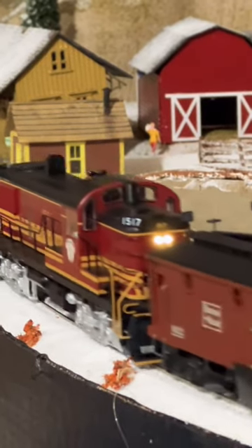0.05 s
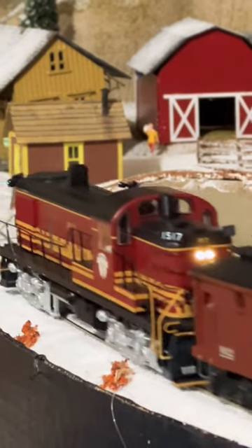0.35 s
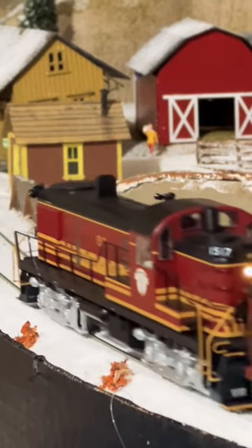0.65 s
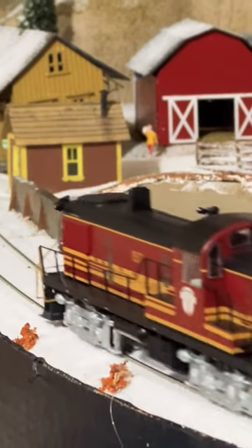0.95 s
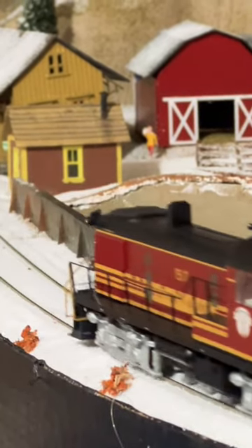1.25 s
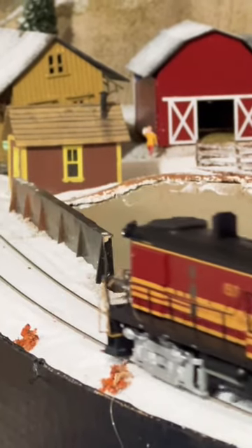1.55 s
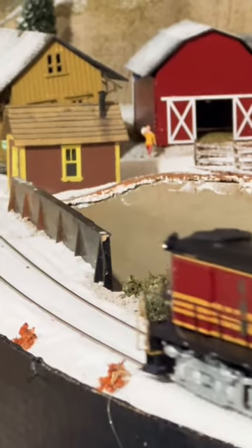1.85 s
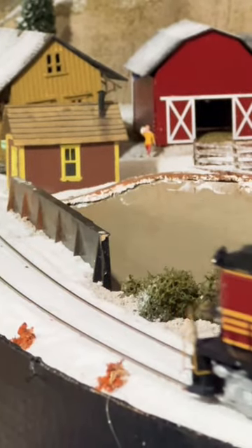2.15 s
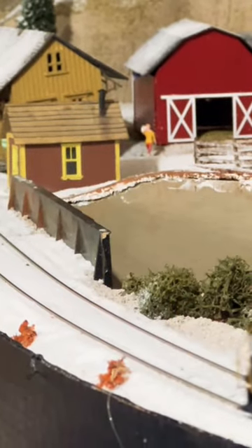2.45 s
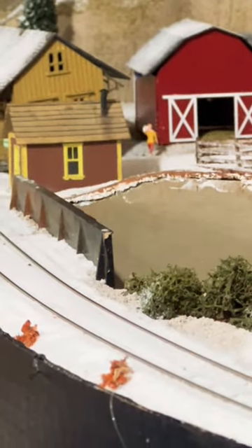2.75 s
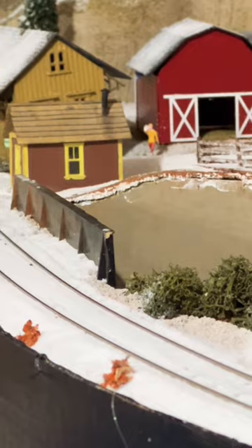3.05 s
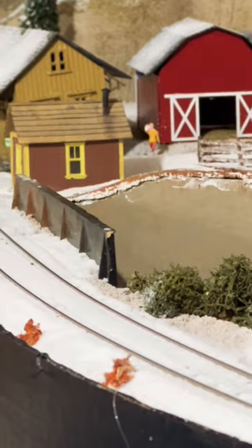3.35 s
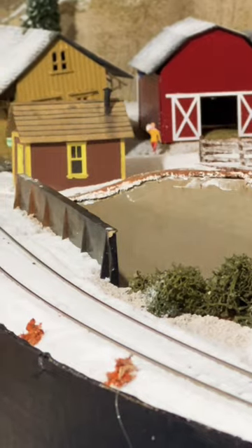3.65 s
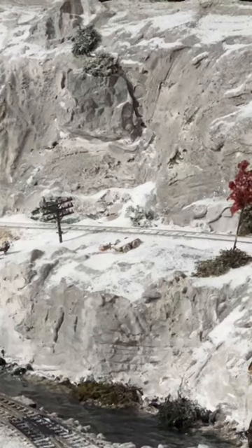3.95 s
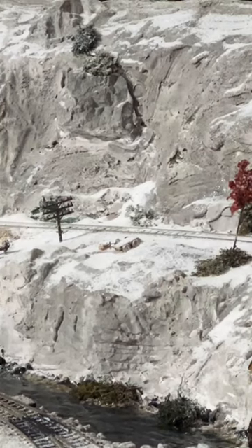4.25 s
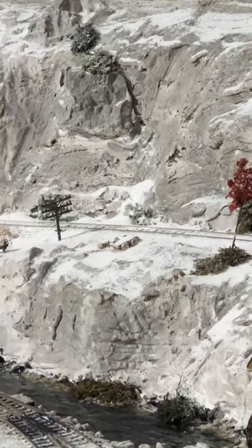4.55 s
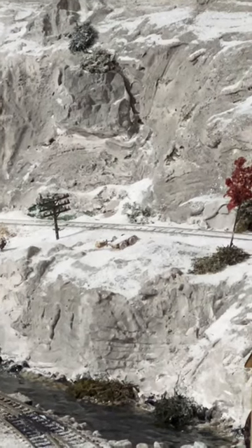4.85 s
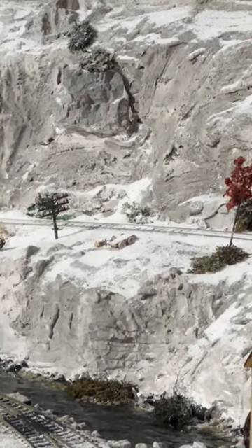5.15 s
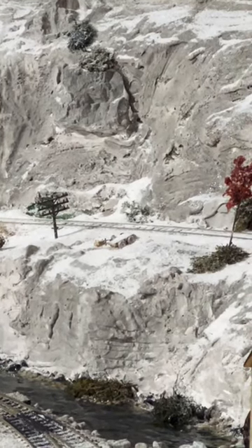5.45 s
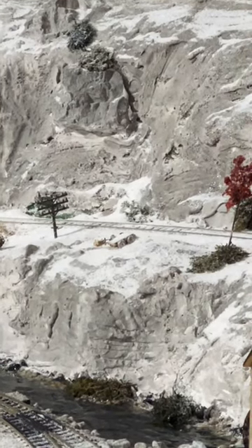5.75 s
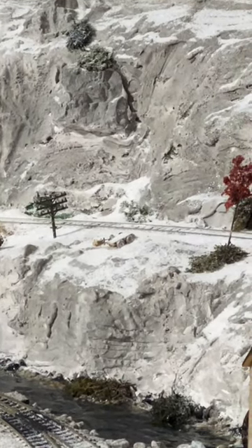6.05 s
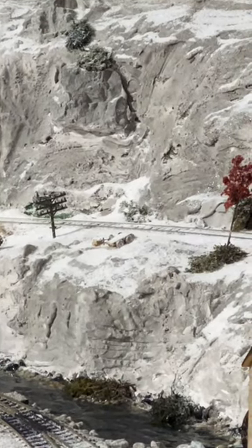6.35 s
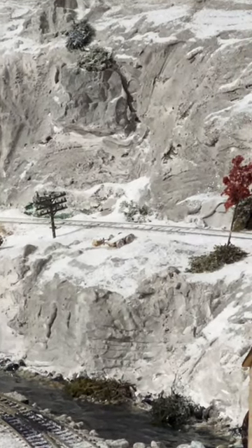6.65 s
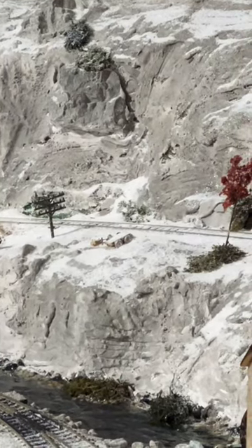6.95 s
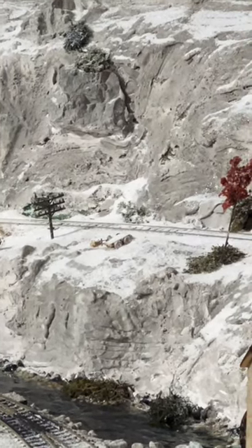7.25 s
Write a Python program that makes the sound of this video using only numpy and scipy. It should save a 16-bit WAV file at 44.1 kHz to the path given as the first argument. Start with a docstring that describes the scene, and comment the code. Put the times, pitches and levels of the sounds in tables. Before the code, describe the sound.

A model train runs close by with a throbbing mechanical buzz and irregular knocks, then sounds suddenly quieter and farther away.

```python
"""On a table layout an electric model locomotive hauls its cars, heard close by on a bend, then
abruptly from farther off at a cliff. Tooth impacts and rolling noise force the plastic shell, board
and rails into a buzz that throbs with each turn of the axle; slack in the drive knocks in time with it.
The board drones under the wheels, the flanges set the rail singing, the wheels clack over rail joints,
the pickups tick now and then, and the room hums."""
import sys
import numpy as np
from scipy import signal
from scipy.fft import rfft, irfft
from scipy.io import wavfile
from scipy.ndimage import uniform_filter1d, map_coordinates

SR = 44100
rng = np.random.default_rng(int(sys.argv[2]) if len(sys.argv) > 2 else 0)


def int16_out(signal):
    """Quantize to a 16-bit WAV file."""
    q = np.round(np.clip(np.atleast_2d(signal).T, -1, 1) * 32767)
    wavfile.write(sys.argv[1], SR, q.astype(np.int16))


N = 326340
TIME = np.arange(N) / SR
FREQ = np.maximum(np.arange(N // 2 + 1) * SR / N, 1)
CUT_S = 3.676   # the listener moves from the bend to the cliff

# rotation of the axle, about 6.4 turns a second: t/s, angle/turns
AXLE = [(0, -.39), (.522, 3), (1.307, 8), (1.614, 10), (2.255, 14), (3.19, 20), (3.675, 23.13),
        (3.68, 23.66), (5.133, 33), (6.402, 41), (7.4, 47.4)]
# level of the train at each place: t/s, gear whir/dB, treble/dB, hiss/dB
BEND_RUN = [(0, -31.5, -58.5, -57), (.8, -31, -57.5, -54.5), (1.1, -32, -58.5, -56.5),
            (1.45, -31, -58.5, -54), (1.8, -31, -56.5, -49), (2.101, -29.5, -55, -52.5),
            (2.45, -29, -49.5, -49), (2.85, -28, -51, -51), (3.1, -27.5, -50.5, -51), (3.37, -27, -47, -51),
            (3.65, -27, -49.5, -57.5)]
CLIFF_RUN = [(3.7, -38.5, -56, -54.5), (4.25, -37.5, -58, -52.5), (4.6, -38, -58.5, -55),
             (5, -38, -57, -54.5), (5.3, -37, -54.5, -55.5), (5.7, -36, -59.5, -54.5),
             (6.02, -35, -53.5, -50.5), (6.35, -35.5, -55.5, -53), (6.6, -35.5, -56.5, -50),
             (7.05, -37, -60.5, -51.5), (7.4, -36, -57, -54.5)]
# hard knocks of the slack drive: t/s, peak/dB, f/Hz
HARD_KNOCKS = [(.057, -20.5, 1900), (0.212, -22.5, 1820), (0.317, -20, 1810), (0.3669, -17.5, 1860),
               (0.4718, -20.5, 1780), (0.5212, -16, 1790), (.680, -18, 1810), (0.732, -19.5, 1696),
               (.784, -21, 1800), (0.8338, -15.5, 1750), (.944, -19, 1700), (1.3063, -19.5, 1800),
               (1.411, -17, 1710), (1.4578, -16.5, 1740), (1.6134, -17, 1770), (1.877, -21, 1680),
               (2.206, -20, 1750), (2.257, -14.5, 1730), (2.5674, -16, 1830), (2.7234, -19, 1830),
               (2.826, -15, 1820), (2.8778, -14, 1830), (2.9845, -19.5, 1730), (3.032, -15, 1740),
               (3.1898, -13.5, 1860), (3.243, -14.5, 1703), (3.344, -12.5, 1780), (3.4537, -14.5, 1730),
               (3.4997, -14, 1920), (3.608, -17, 1850), (3.651, -17, 1905), (3.833, -26, 1840),
               (3.887, -25, 1850), (4.0417, -30, 1840), (4.199, -30, 1880), (4.353, -29, 1806),
               (4.51, -29, 1905), (5.133, -39, 1950), (5.395, -39, 1560), (6.191, -29, 1860),
               (6.3445, -32, 1800), (6.4, -27, 1870), (6.5543, -32, 1770), (6.766, -28, 1800),
               (6.976, -26.5, 1724)]


def from_db(db):
    """Amplitude ratio of a level in decibels."""
    return 10 ** (np.asarray(db) / 20)


def unit_rms(x):
    """Normalisation to unit mean power."""
    return x / np.sqrt(np.mean(x ** 2) + 1e-20)


def in_time(rows):
    """Linear interpolation of each column at every sample."""
    s, *columns = np.transpose(rows)
    return [np.interp(TIME, s, column) for column in columns]


def colour(points, modes=()):
    """Frequency response: an interpolated curve with Lorentzian peaks and dips in its level."""
    hz, db = np.transpose(points)
    humps = sum(lift / (1 + (2 * (FREQ - centre) / width) ** 2) for centre, width, lift in modes)
    return from_db(np.interp(np.log(FREQ), np.log(hz), db) + humps)


def noise(points):
    """Two incoherent noises with the same spectrum."""
    return unit_rms(irfft(rfft(rng.standard_normal((2, N))) * colour(points), N))


def drift(hz):
    """Random fluctuation: low-pass noise of unit power."""
    return unit_rms(irfft(rfft(rng.standard_normal(N)) / (1 + (FREQ / hz) ** 2), N))


def swell(start_s, length_s, attack_s=.04, release_s=.053):
    """Envelope with linear attack, hold and exponential decay."""
    attack = np.clip((TIME - start_s) / attack_s + .5, 0, 1)
    return attack * np.exp(-np.maximum(TIME - start_s - length_s, 0) / release_s)


def resonate(x, hz, width):
    """Damped two-pole resonator with unit gain at its peak."""
    r = np.exp(-np.pi * width / SR)
    poles = [1, -2 * r * np.cos(2 * np.pi * hz / SR), r * r]
    return signal.lfilter(np.array([1, 0, -1]) * (1 - r * r) / 2, poles, x + 1e-18)


def struck_mode(blow, hz, width):
    """Transient response of three resonators in cascade: it swells to a peak of 1 and decays."""
    for _ in range(3):
        blow = resonate(blow, hz, width)
    return blow / np.abs(blow).max()


def moving_band(x, hz, width):
    """Heterodyne band-pass filter with a moving centre frequency."""
    carrier = np.exp(2j * np.pi * np.cumsum(hz) / SR)
    r = np.exp(-np.pi * width / SR)
    return 2 * np.real(signal.lfilter([1 - r], [1, -r], x / carrier) * carrier)


def stereo(pair, direct_share=.25):
    """Mid-side stereo: the side holds scattered sound and some direct sound in quadrature."""
    # stereo width: f/Hz, side gain/dB
    width = [(60, -16.5), (200, -12), (550, -14.5), (950, -11.5), (1350, -15.5), (1800, -24.5), (2150, -47),
             (2900, -13), (4700, -15), (5400, -32), (5900, -9.5), (6200, -21), (6550, -43), (7150, -42.5),
             (7700, -8), (8700, 0), (9700, 22), (11500, 5.5), (13000, -20)]
    direct, scattered = rfft(pair)
    blend = 1j * np.sqrt(direct_share) * direct + np.sqrt(1 - direct_share) * scattered
    side = irfft(blend * colour(width), N)
    return np.array([pair[0] + side, pair[0] - side])


def room(air_db=-75, hum_db=-82, hum_hz=120):
    """Ambient noise: a low broadband floor and a pure tone of mains hum."""
    # spectrum of the still room: f/Hz, level/dB
    air = [(20, -11.5), (40, -1.5), (56, 4), (120, 0), (200, -0.5), (500, -18.5), (2000, -27.5),
           (14000, -54)]
    hum = np.sqrt(2) * np.sin(2 * np.pi * hum_hz * TIME)
    return from_db(air_db) * stereo(noise(air)) + from_db(hum_db) * hum


def board(drone_db=-78, ring_db=-82):
    """Sounding-board radiation: a drone and a hollow ring swell as the wheels cross loose spans."""
    # loose spans: t/s, duration/s, drone/dB, ring/dB
    spans = [(0.726, 0.41, -83.5, -68), (1.632, 0.31, -89, -65.5), (2.197, 0.17, -64, -72),
             (2.404, .33, -69.5, -65.5), (3.046, 0.58, -63.5, -66.5), (6.267, 0.15, -73, -84),
             (7.092, 0.12, -70.5, -94)]
    # spectra of the drone and the ring: f/Hz, level/dB
    drone_colour = [(30, -25.5), (55, -15.5), (82, -3.5), (95, 2), (115, -8.5), (150, -6.5), (300, -55)]
    ring_colour = [(150, -39), (240, -8), (268, 0), (300, -3), (420, -54.5)]
    drone = from_db(drone_db) + sum(from_db(db) * swell(s, length) for s, length, db, _ in spans)
    ring = from_db(ring_db) + sum(from_db(db) * swell(s, length) for s, length, _, db in spans)
    return stereo(drone * noise(drone_colour) + ring * noise(ring_colour))


def pickup_ticks():
    """Impulse response of a broad treble band: a tiny crack where a pickup loses the rail."""
    # breaks of contact: t/s, impulse level/dB
    breaks = [(.672, -45), (1.69, -50), (3.291, -40), (3.48, -61)]
    impulses = np.zeros(N)
    for s, db in breaks:
        impulses[int(s * SR)] = from_db(db)
    return 2 * resonate(impulses, hz=11000, width=6000)


def flanges(force):
    """Frictional excitation: each rub drives one resonance of the rail with the rolling force."""
    # rubs of the flanges: t/s, duration/s, f/Hz, bandwidth/Hz, level/dB
    rubs = [(1.683, 0.2, 6730, 450, -61), (3.3, 0.34, 4820, 800, -63.5), (3.87, 0.25, 5780, 200, -60),
            (4.24, 0.16, 3496, 150, -57.5), (4.27, 0.17, 5200, 450, -56.5), (4.75, 0.46, 6330, 129, -59.5),
            (5.163, 0.23, 6980, 350, -59.5), (5.488, 0.28, 6700, 170, -59), (5.622, .4, 5250, 280, -58.5),
            (5.968, 0.63, 6410, 220.6, -55), (6.55, .3, 2732, 80, -51), (6.72, 0.44, 5900, 190, -58.5),
            (6.722, 0.51, 7460, 280, -62), (6.802, .3, 3020, 80, -52), (7.22, 0.16, 2640, 70, -50),
            (7.242, .15, 7050, 350, -65)]
    return sum(from_db(db) * swell(s, length) * unit_rms(resonate(resonate(force, hz, width), hz, width))
               for s, length, hz, width, db in rubs)


def joint_clacks(spread_db=5):
    """Modal superposition: a wheel drop strikes every mode of the truck with a random strength."""
    # wheel drops at rail joints: t/s, peak/dB
    drops = [(5.727, -24), (5.740, -34), (5.784, -29), (6.345, -27), (6.836, -24.5), (6.863, -23),
             (7.019, -26)]
    # modes of the truck: f/Hz, bandwidth/Hz, level/dB
    truck = [(1066, 100, -7.5), (1370, 220, -4), (1690, 190, -4), (2180, 200, -5.5)]
    out, blow = np.zeros(N + SR), signal.unit_impulse(SR // 10)
    for s, peak_db in drops:
        ring = sum(from_db(db + spread_db * rng.standard_normal()) * struck_mode(blow, hz, width)
                   for hz, width, db in truck)
        start = int(s * SR)
        out[start:start + len(ring)] += from_db(peak_db) * ring / np.abs(ring).max()
    return out[:N]


def soft_knocks(jitter_s=.0014, spread_db=6.5, pitch_hz=1836, spread_hz=26):
    """Periodic backlash: the drive catches at fixed angles of the axle. Rows of t/s, peak/dB, f/Hz."""
    # catches of the drive: angle/turns, level/dB
    catches = [(0, 0), (.17, -4), (0.349, -2), (.51, -5), (.675, -2), (.84, -4)]
    axle_s, turns = np.transpose(AXLE)
    passed = [(turn + share, db) for turn in range(int(turns[-1]) + 1) for share, db in catches]
    angle, catch_db = np.transpose(passed)
    late, strong, high = rng.standard_normal((len(angle), 3)).T
    s = np.interp(angle, turns, axle_s) + jitter_s * late
    run_s, whir_db, *_ = np.vstack([BEND_RUN, CLIFF_RUN]).T
    peak_db = np.interp(s, run_s, whir_db) + catch_db + spread_db * strong
    peak_db += np.where(s > CUT_S, -6, -1)   # from afar they sink into the rattle
    rows = np.transpose([s, peak_db, pitch_hz + spread_hz * high])
    to_hard_knock_s = np.abs(s[:, None] - np.array(HARD_KNOCKS)[:, 0]).min(axis=1)
    return rows[(to_hard_knock_s > .02) & (angle < turns[-1]) & (s < TIME[-1])]


def drive_knocks(length_s=.045, width_spread=.36, rebound=.077, far_stretch=1.6):
    """Impact excitation: the slack closes and rebounds once; the shell rings, longer from afar."""
    # modes of the shell: ratio to the knock's pitch, bandwidth/Hz, level/dB
    shell = [(.8, 327, -20), (1, 251, 4), (1.82, 806, -31)]
    out, size = np.zeros(N + SR), int(length_s * SR)
    for s, peak_db, hz in np.vstack([HARD_KNOCKS, soft_knocks()]):
        stretch = far_stretch if s > CUT_S else 1
        damping = np.exp(width_spread * rng.standard_normal(len(shell))) / stretch
        rebound_s = np.clip(rng.normal(.006, .002), .003, .012)
        blow = signal.unit_impulse(size)
        blow[int(rebound_s * SR)] = rebound
        ring = sum(from_db(db) * struck_mode(blow, hz * ratio, width * widen)
                   for (ratio, width, db), widen in zip(shell, damping))
        start = int(s * SR)
        out[start:start + size] += from_db(peak_db) * ring / np.abs(ring).max()
    return out[:N]


def scenery(force, echoes, start_s, end_s, above_hz, props=12, prop_db=-20, near_ms=2.5, far_ms=30):
    """Comb filtering: treble returns from surfaces and small props along paths of changing length."""
    direct, scattered = force
    treble = irfft(rfft(direct) / (1 + (above_hz / FREQ) ** 4), N)
    times = np.linspace(start_s, end_s, num=3)
    for *lags_ms, db in echoes:
        lag_ms = np.polyval(np.polyfit(times, lags_ms, 2), TIME)
        direct = direct + from_db(db) * np.interp(TIME - lag_ms / 1000, TIME, treble)
    for distance, heading in rng.random((props, 2)):
        ms_per_s = .15 * (2 * heading - 1)
        lag_ms = near_ms * (far_ms / near_ms) ** distance + ms_per_s * (TIME - times[1])
        direct = direct + from_db(prop_db) * np.interp(TIME - lag_ms / 1000, TIME, treble)
    return np.array([direct, scattered])


def cliff_interference(force, lift_db=3, hollow_db=-7, below_hz=195):
    """Interference reinforces one band and weakens the one below; both rise as the train moves."""
    # centre of the reinforced band: t/s, f/Hz
    climb = [(3.7, 1760), (4.35, 1870), (4.7, 1950), (5.2, 2050), (5.8, 2140), (7.4, 2186)]
    hz, = in_time(climb)
    direct, scattered = force
    hump = (from_db(lift_db) - 1) * moving_band(direct, hz, width=110)
    hollow = (from_db(hollow_db) - 1) * moving_band(direct, hz - below_hz, width=130)
    return np.array([direct + hump + hollow, scattered])


def impact_power(strengths, decay_s):
    """Exponential decay of the power of each impact in a run, scaled to a mean of 1."""
    power = signal.lfilter([1], [1, -np.exp(-1 / (decay_s * SR))], strengths ** 2 + 1e-18)
    return power / power.mean()


def contact_loss_db(depth_db=1.0, length_s=.012, lead_s=.0003):
    """Backlash: the teeth part at each hard knock, and the rolling force dips."""
    moments = np.zeros(N)
    moments[[int((s - lead_s) * SR) for s, *_ in HARD_KNOCKS]] = 1
    return depth_db * signal.fftconvolve(moments, np.hanning(int(length_s * SR)), "same")


def binding_db(turns):
    """Eccentricity: each part of the drive runs out of true and tightens once per revolution."""
    # rotating parts: revolutions per axle turn, throb/dB, tightest angle/turns
    gears = [(1, 0.51, 0.8), (3, 0.76, 0.018), (4, 0.95, 0.96), (6, 2, 0.0032)]
    return sum(db * np.cos(2 * np.pi * ratio * (turns - tightest)) for ratio, db, tightest in gears)


def roughness(turns, rim_share=.25, slip_turns=.0003, rim_points=7000):
    """Rolling noise from surface roughness: worn rims repeat every turn, the rail is always new."""
    rim = rng.standard_normal(rim_points)
    place = (turns + slip_turns * drift(16)) * rim_points
    repeating = unit_rms(map_coordinates(rim, [place % rim_points], order=3, mode="wrap"))
    rail, scattered = rng.standard_normal((2, N))
    return np.array([np.sqrt(rim_share) * repeating + np.sqrt(1 - rim_share) * rail, scattered])


def running_gear(flutter_db, tooth_share, grit_share, gear_ratio=6, poles=5, grit_per_s=400):
    """Amplitude modulation of rolling noise by teeth, grit and binding: force, direct and scattered."""
    turns, = in_time(AXLE)
    motor_turns = turns * gear_ratio
    # every pole of the motor jerks the teeth together
    teeth = np.diff(np.floor(motor_turns * poles + .15 * drift(80)), prepend=0) > 0
    teeth = teeth * from_db(4 * np.clip(rng.standard_normal(N), -2, 2))
    grit = (rng.random(N) < grit_per_s / SR) * rng.random(N)
    power = 1 + tooth_share * impact_power(teeth, .0014) + grit_share * impact_power(grit, .003)
    shaft_flutter = np.cos(2 * np.pi * 2 * motor_turns)   # twice a revolution
    throb_db = binding_db(turns) + flutter_db * shaft_flutter + 1.35 * drift(69)
    strength = unit_rms(np.sqrt(power) * from_db(throb_db))
    rolling = roughness(turns) * from_db(-contact_loss_db())
    # the heavy board evens out the throb below 1400 Hz, the light shell follows it fully
    low_pass = 1 / (1 + (FREQ / 1400) ** 10)
    through_board = rfft(rolling * strength ** .12) * low_pass
    through_shell = rfft(rolling * strength) * (1 - low_pass)
    return unit_rms(irfft(through_board + through_shell, N))


def train(force, run, registers, tone, modes, midway_s, glide_s, wander_db=.6):
    """Forced vibration of board, shell and rails; modes and registers shift as the train moves."""
    # borders between rumble, whir, rattle, scrape, hiss and sizzle: f/Hz
    crossovers = [190, 750, 2350, 4000, 5600, 7050]
    onward = lambda s: .5 + .5 * np.tanh((TIME - s) / glide_s)
    modes, out = np.array(modes), 0
    early = irfft(rfft(force) * colour(tone, modes[:, [0, 1, 2]]), N)
    late = irfft(rfft(force) * colour(tone, modes[:, [0, 1, 3]]), N)
    spectrum = rfft(early + (late - early) * onward(midway_s))
    above = [1 / (1 + (hz / FREQ) ** 20) for hz in crossovers] + [0]
    whir_db, treble_db, hiss_db = in_time(run)
    for k, (treble, hiss, offset_db, change_db, change_s) in enumerate(registers):
        level_db = whir_db + treble * (treble_db - whir_db) + hiss * (hiss_db - whir_db)
        level_db += offset_db + change_db * onward(change_s) + wander_db * drift(3.7)
        band = irfft(spectrum * (above[k] - above[k + 1]), N)
        running_rms = np.sqrt(uniform_filter1d(band[0] ** 2, size=SR // 2))
        out = out + band / running_rms * from_db(level_db)
    return out


def scene():
    """Superposition of all sources on the bend, then at the cliff, where more sound is reflected."""
    # reflections off the scenery: first delay/ms, halfway delay/ms, last delay/ms, level/dB
    bend_echoes = [(3.93, 4.29, 4.6, -13), (1.52, 1.38, 1.31, -22), (7.2, 7.1, 6.8, -22)]
    cliff_echoes = [(2.12, 1.81, 1.69, -16), (1.5, 1.42, 1.16, -18), (2.79, 2.46, 2.24, -16),
                    (1.21, .9, .6, -20), (4.1, 3.75, 3.4, -15), (7, 6.4, 6.1, -13), (10.2, 10.4, 10.9, -19)]
    # overall tone colour as heard, with a deep gap in the treble near 9 kHz: f/Hz, level/dB
    bend_tone = [(200, -43), (400, -42.5), (700, -23), (1000, -6.5), (1700, -7), (2400, -16.5), (3200, -15),
                 (4100, -32.5), (5000, -31.5), (6500, -40), (8500, -45), (9300, -76), (12000, -47.5),
                 (14000, -63.5)]
    cliff_tone = [(200, -38), (400, -30.5), (700, -26), (1000, -13), (1700, -12.5), (2400, -22),
                  (3200, -32), (4100, -32), (5000, -30), (6500, -27.5), (8400, -41.5), (9200, -80),
                  (12000, -50), (14000, -63)]
    # modes of board, shell and rails: f/Hz, bandwidth/Hz, early lift/dB, late lift/dB
    bend_modes = [(364, 70, -2, 11.5), (434, 100, 5.5, 10.5), (491.5, 11, 1.5, 11.5), (602, 7.2, 12, 8),
                  (827, 6.7, 9, -1), (1057, 35, 6, 4.5), (1079, 23, 4, 0), (1276, 20, -1, 3.5),
                  (1376, 44, 6, 2.5), (1480, 30, 4.5, 1), (1560, 42, -4, -1.5), (1657, 48, 5.5, 6.5),
                  (1858, 250, 7.5, 4.5), (1940, 110, -2.5, 2.5), (2180, 240, 3.5, 6.5), (2750, 530, 5, 1.5),
                  (3550, 790, 5.5, 10.5), (4390, 350, 7.5, 4), (5000, 710, 5, 7), (5860, 350, 6.5, 4),
                  (6360, 630, 11, 13.5), (7460, 240, 6.5, 11.5)]
    cliff_modes = [(568, 23, 8.5, 2), (715, 54, 4.5, -11.5), (805, 81, 10.5, 1.5), (835, 22, 6, 6.5),
                   (924, 24, -3, 13.5), (959, 74, -2, -9), (1048, 30, 4.5, 12.5), (1086, 35, 9, 8.5),
                   (1134, 40, -7, -7.5), (1220, 50, 7.5, 6.5), (1270, 53, 0, 3.5), (1288, 30, 8.5, 0.5),
                   (1383, 52, 6.5, 8.5), (1500, 42, 13, 0), (1575, 42, 7.5, -12), (1624, 37, -1, 8),
                   (1744, 28, 6, 9), (1868, 52, 13.5, 10), (2100, 88, 6, -3), (2188, 55, 3, 12),
                   (2370, 44, -2.5, 5.5), (2474, 79, 2.5, 15.5), (2650, 105, 9, 3), (2750, 73, -3, 16),
                   (2896, 164, 13.5, 5.5), (2960, 52, -6, 9), (3310, 130, 6, 12.5), (3530, 28, 5.5, 7),
                   (4050, 580, -3.5, -3.5), (5080, 175, 5, 1), (5470, 144, -4, -9.5), (5930, 120, 0, 9.5),
                   (6350, 208, 10.5, 5.5), (6450, 210, -6.5, 5.5), (7200, 138, -5.5, -7), (7535, 210, 4, 7)]
    # registers, rumble to sizzle: treble share, hiss share, offset/dB, change/dB, t of change/s
    bend_registers = [(0.098, 0, -21, 0, 2.8), (0.0067, 0.023, -0.52, 0.4, 1.4),
                      (0.079, 0.068, -7.5, -3.5, 2.36), (0.95, 0.15, -0.5, 4, 2.43),
                      (0.035, 0.96, -0.5, 0.9, 2), (0.12, 0.87, -14, 4, 2.8)]
    cliff_registers = [(0, 0.05, -22, -5, 5.25), (0, 0.005, -1.2, 1.5, 5.1), (0.17, 0.11, -5, 1.5, 6.4),
                       (1, 0.035, -1.5, -0.7, 6.3), (0, 1, -3.24, 0.5, 5.4), (0, 0.98, -14, -1.5, 4.5)]
    force = running_gear(flutter_db=1.3, tooth_share=.46, grit_share=.19)
    blurred = running_gear(flutter_db=.8, tooth_share=.26, grit_share=.095)
    near = scenery(force, bend_echoes, 0, CUT_S, above_hz=1170)
    far = cliff_interference(scenery(blurred, cliff_echoes, CUT_S, TIME[-1], above_hz=2000))
    bend = train(near, BEND_RUN, bend_registers, bend_tone, bend_modes, midway_s=2.1, glide_s=.42)
    cliff = train(far, CLIFF_RUN, cliff_registers, cliff_tone, cliff_modes, midway_s=5.73, glide_s=1.0)
    at_cliff = np.clip(.5 + (TIME - CUT_S) / .003, 0, 1)
    rolling = bend * (1 - at_cliff) + cliff * at_cliff + flanges(force)
    return stereo(rolling) + drive_knocks() + joint_clacks() + pickup_ticks() + board() + room()


def record(dry, reduction=.18, fast_s=.0043, slow_s=.39, cutoff_hz=13900):
    """Dynamic compression holds down peaks above the running level; a steep low-pass cuts the top."""
    power = np.mean(dry ** 2, axis=0)
    fast, slow = (uniform_filter1d(power, size=int(s * SR)) + 1e-12 for s in (fast_s, slow_s))
    gain = np.maximum(fast / slow, 1) ** (-reduction / 2)
    low_pass = signal.ellip(10, .1, 80, cutoff_hz, fs=SR, output="sos")
    return signal.sosfilt(low_pass, dry * gain)


dry = scene()
out = record(dry)
int16_out(out)
```